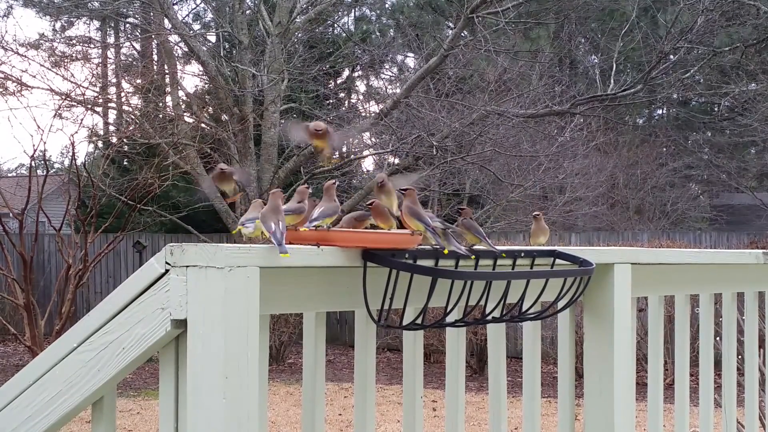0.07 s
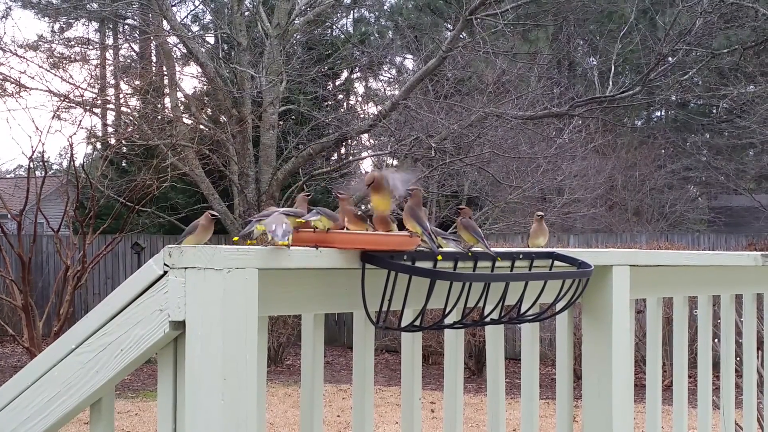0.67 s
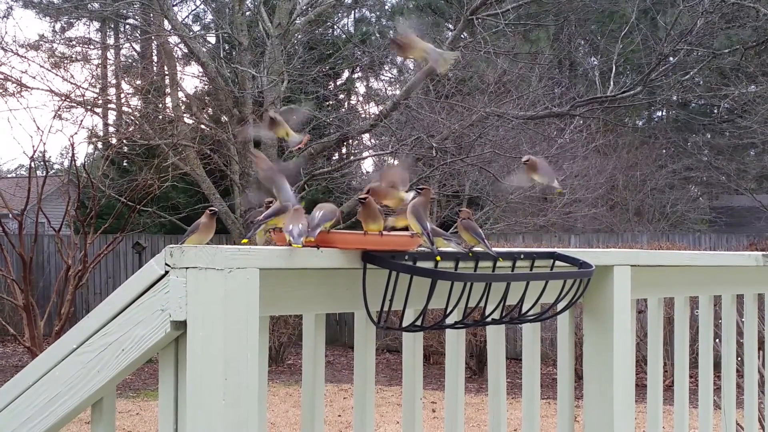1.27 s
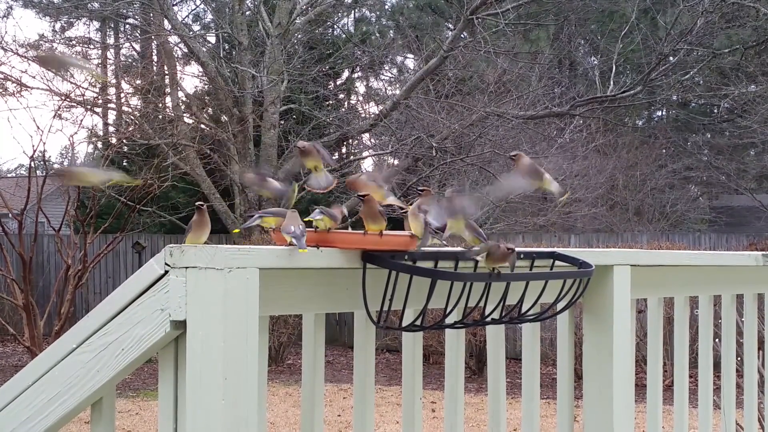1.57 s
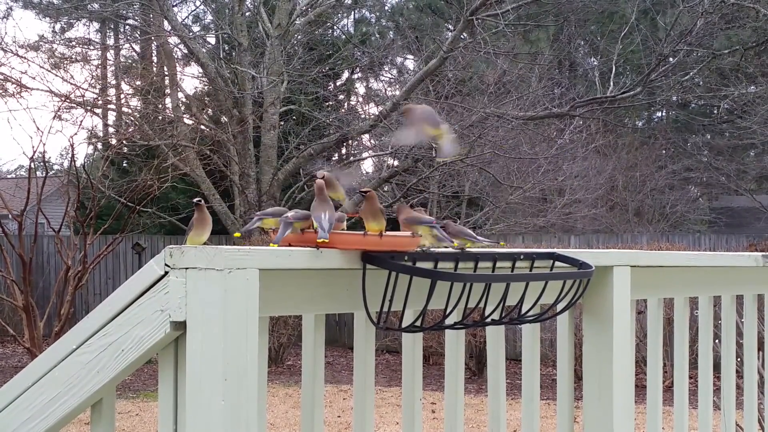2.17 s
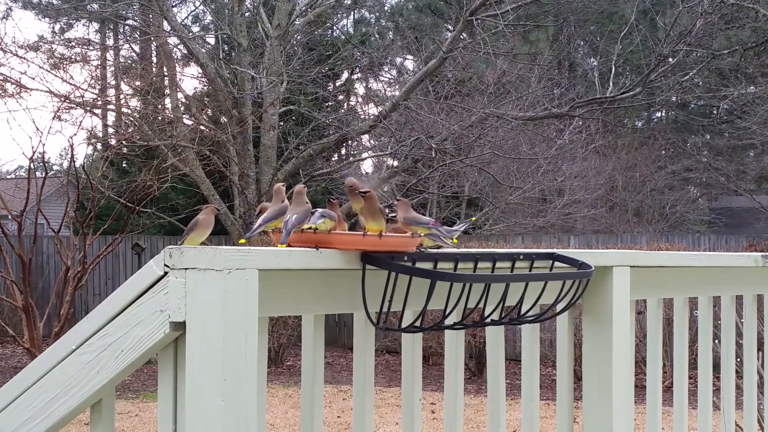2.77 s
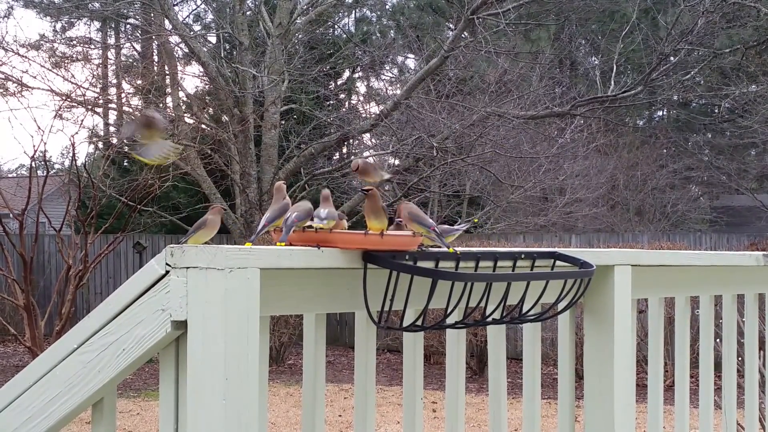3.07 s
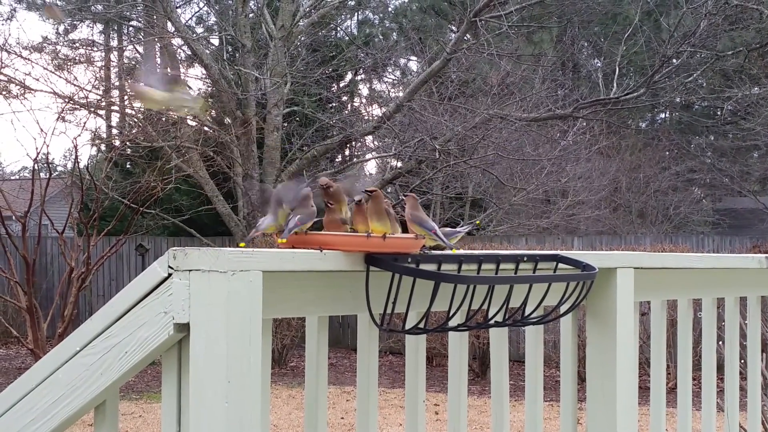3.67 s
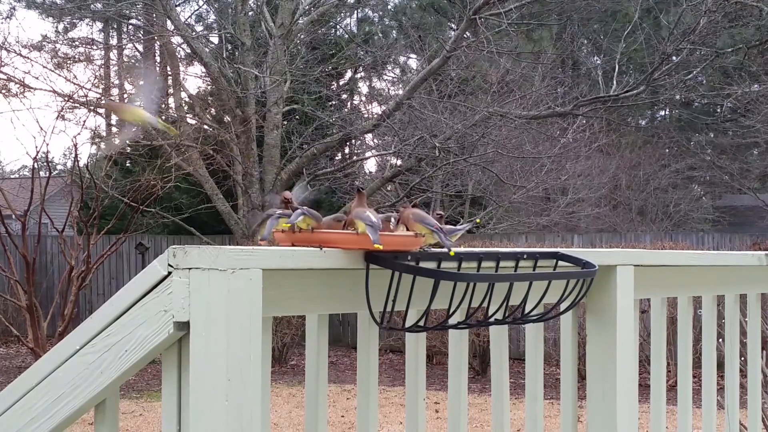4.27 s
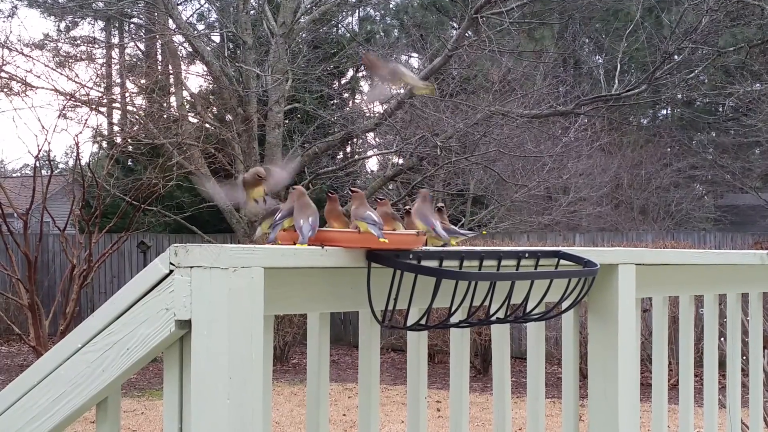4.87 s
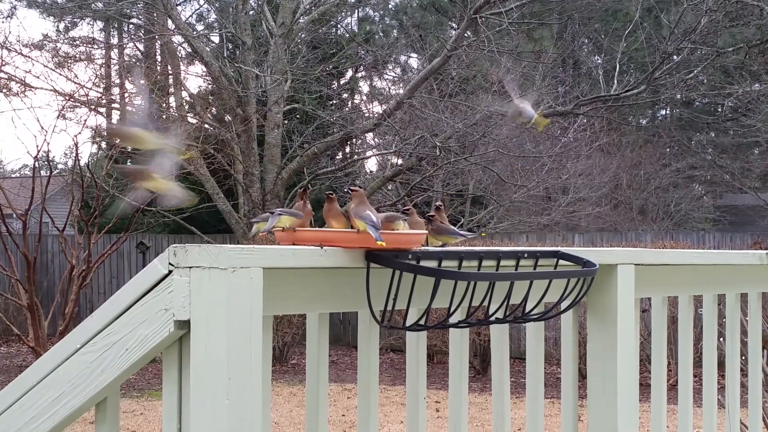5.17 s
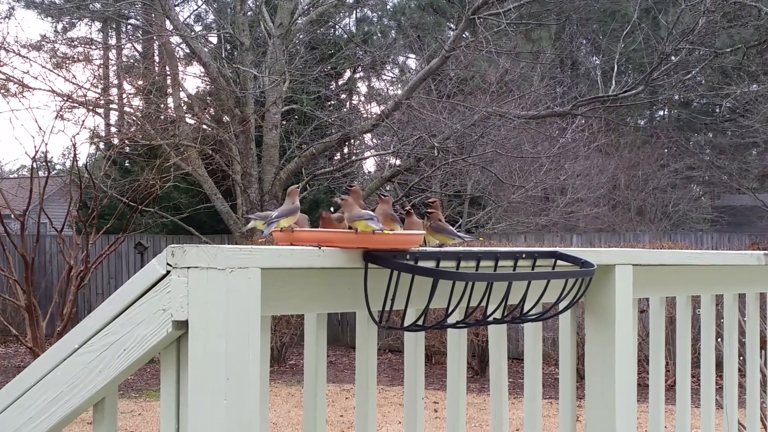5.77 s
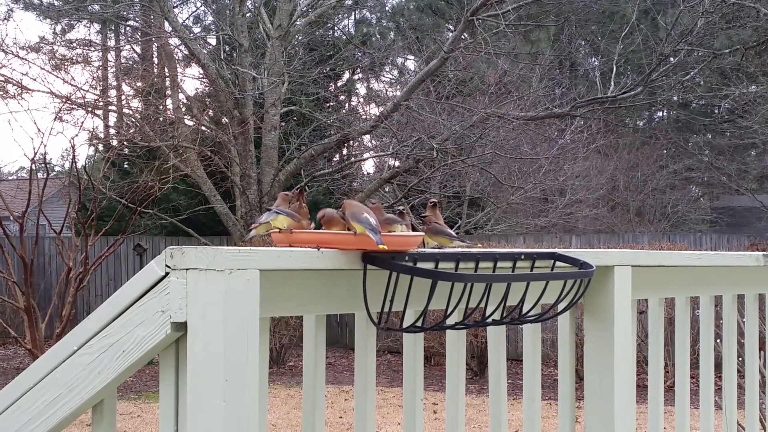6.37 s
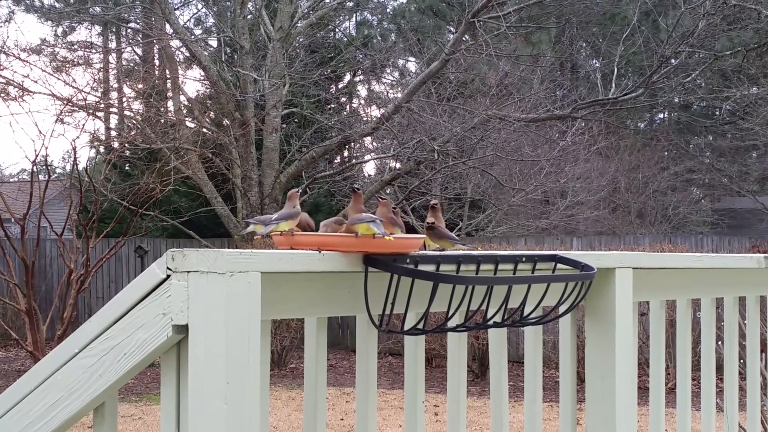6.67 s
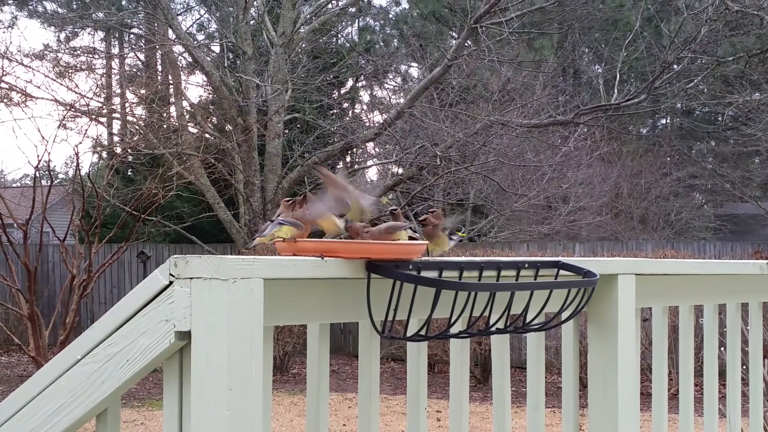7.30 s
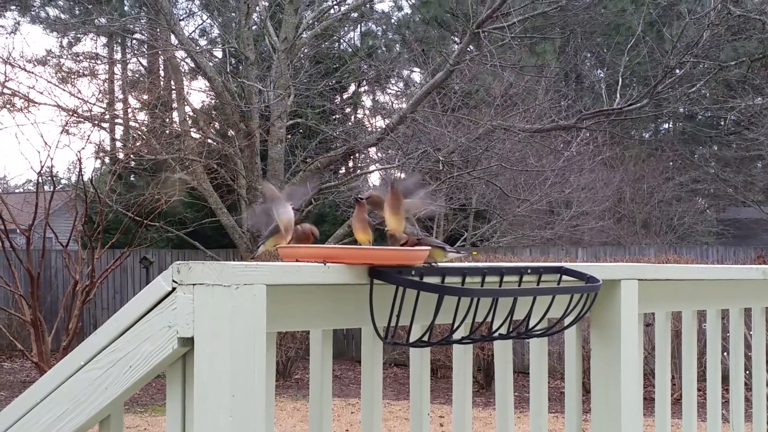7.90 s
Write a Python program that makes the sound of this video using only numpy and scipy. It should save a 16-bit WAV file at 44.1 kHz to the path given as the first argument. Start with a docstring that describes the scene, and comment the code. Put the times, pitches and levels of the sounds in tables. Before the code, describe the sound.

Wingbeats from a flock of small birds swell and fade outdoors, with faint high calls and claw ticks over rumble and hiss.

```python
"""Wingbeats whoosh and rustle: waxwings crowd a dish on a deck rail, a few metres from a phone.
Each downstroke pushes air and rubs feathers. Single birds flutter close to the microphone, claws tick
and landings bump the rail. Thin whistles, a squeal and a trill echo round the yard.
The whoosh, a low rumble and a narrow hiss swell and sink together as one overall background level.
The right microphone is far brighter at the very top than the left."""
import sys
import numpy as np
from scipy import signal
from scipy.fft import rfft, irfft, next_fast_len
from scipy.io import wavfile
from scipy.ndimage import uniform_filter1d

SR = 44100
rng = np.random.default_rng(int(sys.argv[2]) if len(sys.argv) > 2 else 0)


def dump_mix(stems):
    """Bounce the given channels to the path in sys.argv[1] as a 16-bit WAV at rate SR."""
    frames = np.atleast_2d(stems).T  # one column per channel
    limited = np.clip(frames, -1, 1)  # hard clip at full scale
    pcm = np.round(limited * 32767).astype(np.int16)
    wavfile.write(sys.argv[1], SR, pcm)


N = 358974
T = np.arange(N) / SR

# resonances of the background rumble: f/Hz, width/Hz, relative level/dB
RUMBLE_MODES = [(26.2, 22, -27.5), (42.2, 6.4, -6.5), (57.5, 6, -1.5), (73.4, 7, -1), (82.4, 7, -5),
                (115.6, 5.3, -8), (133.8, 19, -15.5)]
# colour of the background hiss: f/Hz, left/dB, right/dB
HISS_SPECTRUM = [(2850, -19, -25.5), (3070, -23.5, -21.5), (3470, -8, -25.5), (3600, -20.5, -15.5),
                 (4025, 4.5, -24.5), (4330, -5, -15.5), (4810, 0, -19.5), (5250, -4.5, -26.5),
                 (5630, -12, -26), (6110, -12, -32), (6820, -34, -32), (7170, -50, -45)]
# arched whistles: t/s, length/s, start f/Hz, middle f/Hz, end f/Hz, crest level/dB, octave above it/dB
WHISTLES = [(.27, .21, 6750, 7020, 6990, -85, 14), (3.78, .36, 7000, 7180, 6850, -78, 13)]
# course of the squeal's fundamental: t/s, f/Hz, level/dB
SQUEAL_COURSE = [(1.426, 6400, -74), (1.435, 6500, -73), (1.442, 6600, -61), (1.456, 6680, -75),
                 (1.483, 6760, -62.5), (1.506, 6900, -66), (1.528, 6740, -75), (1.538, 6950, -60),
                 (1.585, 6600, -77)]
# course of the trill: t/s, f/Hz, level/dB
TRILL_COURSE = [(5.30, 7650, -94), (5.323, 8200, -84), (5.35, 7800, -82), (5.365, 8150, -82),
                (5.387, 7780, -73), (5.398, 8000, -88)]
# claws on the dish: t/s, level/dB
CLAW_TICKS = [(1.0402, -56), (1.166, -64), (1.268, -66), (2.321, -54), (3.6011, -62), (4.8818, -59),
              (6.1613, -59)]
# colour of a claw's click: f/Hz, left/dB, right/dB
CLAW_SPECTRUM = [(3600, -16, -22), (4900, 14, -20), (6200, 2, -24), (7450, -31, -36), (10000, -26, -31),
                 (14000, -15, -17)]
# birds landing on the rail: t/s, level/dB, f/Hz, decay/s
LANDINGS = [(4.15, -35.5, 62, 0.012), (4.286, -37.5, 130, 0.0069), (4.289, -52, 268.5, 0.0064),
            (6.444, -51, 202, 0.038), (7.95, -56, 198.7, 0.11)]
# single birds flapping near the microphone: t/s, length/s, feather level/dB, air level/dB
FLIGHTS = [(0.194, .03, -61, -63), (0.83, .08, -43, -64), (1.495, .03, -59, -52.5), (1.82, .03, -38.5, -52),
           (4.771, .03, -62, -76), (4.818, .77, -44, -54.5), (5.178, .03, -49, -52.5),
           (7.548, .03, -56, -61)]
# perched birds shuffling their wings: t/s, level/dB, decay/s
SHUFFLES = [(6.795, -70, 0.13), (7.197, -80, .044), (7.447, -69, 0.027)]
# quick contacts within one wing clap: t/s, level/dB
CLAP_CONTACTS = [(1.7681, -28), (1.7706, -22), (1.772, -22)]
# colour of the clap's dull puff: f/Hz, left/dB, right/dB
PUFF_SPECTRUM = [(348, -3, 4.5), (650, -7, 1.5), (1000, -12.5, -5.5)]
# colour of air pushed by a near wing: f/Hz, left/dB, right/dB
NEAR_AIR_SPECTRUM = [(342, 4, 4), (586, -4, -2), (1000, -12, -9.5), (1450, -39, -17), (2090, -20, -16.5),
                     (2940, -29, -26), (4400, -23, -18), (6200, -27, -27.5), (7060, -53, -65)]
# colour of air swept by the flock: f/Hz, left/dB, right/dB
FLOCK_AIR_SPECTRUM = [(169.6, 0, -2.5), (218, -5.5, -0.4), (336, -13, -9.5), (563, -15.5, -15.5),
                      (782, -21.5, -21), (1060, -25.5, -25.5), (1496, -33, -31), (2280, -33, -33.5),
                      (2780, -49, -38.5)]
# colour of feathers sliding over each other: f/Hz, left/dB, right/dB
FEATHER_SPECTRUM = [(8500, -46, -46), (10000, -37, -32), (10800, -32, -22), (11500, -25, -12),
                    (12100, -20, -4.5), (12700, -17, 0), (13600, -17, -.5), (14500, -17, -4),
                    (15650, -16.5, -6.5)]
# overall background level: t/s, swell over the usual level/dB, rustle level/dB
BACKGROUND_LEVEL = [(0.0, -0.2, -58.5), (.72, -2.5, -66.5), (1.35, -0.2, -59), (1.65, 3, -51),
                    (1.95, 5.5, -49), (2.5, 0.7, -59.5), (3.35, -3.5, -69.5), (3.75, -2.3, -63.5),
                    (4.4, 3.5, -58.5), (4.65, -3.5, -67.5), (5.2, 2.5, -54.5), (5.7, 0.65, -58),
                    (6.05, -4.5, -72.5), (6.6, -6, -75), (7.0, -12, -82), (7.35, -11, -83.5),
                    (7.56, -6, -67.5), (8.13, -1.6, -59.5)]

RUMBLE_DB, RUMBLE_GROWTH = -46, 0.74  # at the usual background level; dB per dB of swell
HISS_DB, HISS_KNEE_DB = -66, -0.5  # hiss at a knee in the swell; swell at that knee
HISS_GROWTH, HISS_SINK = 0.45, 0.84  # dB per dB of swell above and below the knee
WHISTLE_SWELL_DB, WHISTLE_FALL_DB, WHISTLE_CREST = 14, 13, .8  # crest as a share of the length
WHISTLE_WAVER_HZ, SQUEAL_WAVER_HZ = 35, 95  # random pitch swings: clean whistles, rough squeal
SQUEAL_OCTAVE_DB = 21.5  # octave over the fundamental, before panning
STROKE_S, STROKE_SCATTER_DB = .0524, 1.5  # time between near downstrokes; spread of their push
STROKE_DECAY_S, STROKE_SMEAR_S = 0.0055, 0.00042  # first stroke's decay; what each later one adds
RECEDE = 0.47  # distance gained per stroke, as a share of the starting distance
AIR_FADE = .3  # share of the feathers' fade in dB that the air follows
OPENING_DB, PUFF_DB = -1, -39  # the first stroke only opens the wing and pushes less; the clap's puff
WHOOSH_DB = -58  # the flock's swept air at the usual background level
RUSTLE_LEFT_DB, RUSTLE_LEFT_SHARE = -23, 0.61  # the left microphone gets weaker swells: offset, dB per dB
TOP_HZ = 15720


def undb(db):
    """Decibels to gain."""
    return 10 ** (np.asarray(db) / 20)


def unit(x):
    """Scale to rms 1."""
    return x / np.sqrt(np.mean(x ** 2))


def pan(right_db):
    """Left and right gains, right_db apart."""
    return undb(np.array([[-right_db], [right_db]]) / 2)


def walk(rate):
    """Smooth random wandering, about rate turns a second."""
    hold = max(int(SR / rate), 1)
    steps = np.repeat(rng.standard_normal(N // hold + 2), hold)
    smooth = uniform_filter1d(uniform_filter1d(steps, hold), hold)
    return 1.241 * smooth[rng.integers(hold):][:N]


def noise(alike=0):
    """White noise at both microphones, sharing this part of its power."""
    return np.sqrt(alike) * rng.standard_normal(N) + np.sqrt(1 - alike) * rng.standard_normal((2, N))


def shape(x, response):
    """Filter by a gain over frequency, to rms 1."""
    size = next_fast_len(N)
    hz = np.arange(size // 2 + 1) * SR / size + 1
    return unit(irfft(rfft(x, size) * response(hz), size)[..., :N])


def tint(x, spectrum, below_db=40, above_db=40):
    """Give each microphone its colour, to joint rms 1; the skirts fall by so many dB an octave."""
    points_hz, *sides_db = np.transpose(spectrum)
    def response(hz):
        octave, knots = np.log2(hz), np.log2(points_hz)
        skirts = below_db * np.maximum(knots[0] - octave, 0) + above_db * np.maximum(octave - knots[-1], 0)
        return undb(np.array([np.interp(octave, knots, db) for db in sides_db]) - skirts)
    return shape(x, response)


def bursts(rows, rise_s):
    """Envelope of bursts that swell briefly and die away; rows are t/s, level/dB, decay/s."""
    out = np.zeros(N)
    for s, db, decay in rows:
        start = int(s * SR)
        age = T[:min(N - start, SR // 2)]
        form = (1 - np.exp(-age / rise_s)) ** 2 * np.exp(-age / decay)
        out[start:start + len(age)] += undb(db) * form / form.max()
    return out


def rumble(swell_db):
    """A low boom in a few resonances, much alike at both microphones, following the background level."""
    def response(hz):
        power = sum(undb(db) ** 2 / (1 + ((hz ** 2 - centre ** 2) / (hz * width)) ** 2)
                    for centre, width, db in RUMBLE_MODES)
        return np.sqrt(power) / (1 + (hz / 210) ** 4)
    return shape(noise(alike=0.78), response) * undb(RUMBLE_DB + RUMBLE_GROWTH * swell_db) * pan(3)


def hiss(swell_db):
    """A smooth narrow hiss, mostly on the left, sinking with the background more readily than it rises."""
    over_db = swell_db - HISS_KNEE_DB
    level_db = HISS_DB + over_db * np.where(over_db > 0, HISS_GROWTH, HISS_SINK)
    return tint(noise(), HISS_SPECTRUM, below_db=12, above_db=37) * undb(level_db)


def yard(x, near_db, far_db):
    """Deck and house scatter a call at once; fence and trees answer a quarter second later."""
    near = undb(near_db) * np.exp(-T / .05) * (T > .003)
    far = undb(far_db) * np.exp(-((T - .25) / .08) ** 2)
    response = noise() * (near + far) / np.sqrt(np.sum(np.exp(-T / .025)))
    return x + signal.fftconvolve(x, response[:, :SR], axes=1)[:, :N]


def syrinx(course, swing_hz, flutter_db):
    """Phase and envelope of a bird's thin note, its pitch swinging about its course."""
    s, hz, db = np.transpose(course)
    gate = np.clip(np.minimum(T - s[0], s[-1] - T) / 0.0054 + .5, 0, 1)
    phase = 2 * np.pi * np.cumsum(np.interp(T, s, hz) + swing_hz) / SR
    return phase, np.sqrt(2) * gate * undb(np.interp(T, s, db) + flutter_db * walk(90))


def arch(start, length, start_hz, middle_hz, end_hz, db):
    """A whistle's course, one bow of pitch swelling to a late crest: t/s, f/Hz, level/dB."""
    along = np.linspace(0, 1, 20)
    hz = np.polyval(np.polyfit([0, .5, 1], [start_hz, middle_hz, end_hz], 2), along)
    level_db = db - np.interp(along, [0, WHISTLE_CREST, 1], [WHISTLE_SWELL_DB, 0, WHISTLE_FALL_DB])
    return np.transpose([start + length * along, hz, level_db])


def whistles_and_squeal():
    """Two whistles and a rough squeal in the yard, their strong octaves almost wholly on the right."""
    notes = [(arch(*row), octave_db, WHISTLE_WAVER_HZ) for *row, octave_db in WHISTLES]
    notes.append((SQUEAL_COURSE, SQUEAL_OCTAVE_DB, SQUEAL_WAVER_HZ))
    out = 0
    for course, octave_db, waver_hz in notes:
        phase, envelope = syrinx(course, swing_hz=waver_hz * walk(500), flutter_db=.7)
        octave = undb(octave_db + 1.5 * walk(120)) * np.sin(2 * phase)
        out = out + envelope * (np.sin(phase) * pan(9) + octave * undb([[-28], [3]]))
    return yard(out, near_db=-10, far_db=-33)


def trill():
    """One trill off to the right, buzzing as its pitch sweeps quickly up and down."""
    buzz_hz = 230 * np.sin(2 * np.pi * 210 * T) + 140 * walk(1200)
    phase, envelope = syrinx(TRILL_COURSE, swing_hz=buzz_hz, flutter_db=4)
    throat = signal.butter(5, [7400, 8450], "bandpass", fs=SR, output="sos")
    note = signal.sosfilt(throat, envelope * np.sin(phase))
    return yard(note * pan(20), near_db=-14, far_db=-23)


def feet():
    """Claws click on the hard dish; landings make the rail ring dully."""
    ticks = bursts([(s, db, .0012) for s, db in CLAW_TICKS], rise_s=0.00082)
    out = tint(noise(), CLAW_SPECTRUM, below_db=20) * ticks
    for s, db, hz, decay in LANDINGS:
        ring = np.sqrt(2) * np.sin(2 * np.pi * np.cumsum(hz * (1 + 0.1011 * walk(90))) / SR)
        out = out + ring * bursts([(s, db - 2.5, decay)], rise_s=0.0057) * pan(7.5)
    return out


def downstrokes():
    """Even wingbeats, fading and blurring as a bird draws away: t/s, feathers/dB, air/dB, decay/s."""
    rows = []
    for start, length, feather_db, air_db in FLIGHTS:
        for k in range(int(length / STROKE_S) + 1):
            fade_db = 20 * np.log10(1 + RECEDE * k)
            push_db = air_db - AIR_FADE * fade_db + OPENING_DB * (k == 0)
            decay = STROKE_DECAY_S + STROKE_SMEAR_S * k
            rows.append((start + k * STROKE_S, feather_db - fade_db, push_db, decay))
    return rows


def close_wings():
    """Downstrokes and shuffles near the microphone, and one wing clap that squeezes out a dull puff."""
    beats = downstrokes()
    pushes = [(s, db + STROKE_SCATTER_DB * rng.standard_normal(), decay) for s, _, db, decay in beats]
    push = bursts(pushes, rise_s=.0025)
    swish = bursts([(s, db, decay) for s, db, _, decay in beats] + SHUFFLES, rise_s=.0013)
    clap = bursts([(s, db, .0004) for s, db in CLAP_CONTACTS], rise_s=0.0036)
    squeeze = bursts([(CLAP_CONTACTS[0][0], PUFF_DB, .004)], rise_s=0.0011)
    feathers = tint(noise(), FEATHER_SPECTRUM, below_db=43) * (swish + clap) * undb([[-15], [0]])
    puff = tint(noise(alike=.3), PUFF_SPECTRUM, below_db=20, above_db=36) * squeeze
    air = tint(noise(alike=.1), NEAR_AIR_SPECTRUM, below_db=12) * (push + undb(-13) * squeeze)
    return feathers + puff + air


def flapping(beat_hz, stroke_width, birds=5):
    """Envelope of several birds beating at their own drifting rates, coming and going; powers add."""
    power = 0
    for _ in range(birds):
        cycles = np.cumsum(beat_hz * (1 + .13 * walk(5.4))) / SR + rng.random()
        pulses = np.exp((np.cos(2 * np.pi * cycles) - 1) / stroke_width)
        power = power + undb(2.5 * walk(4.17)) * pulses
    return unit(np.sqrt(power))


def flock(swell_db, rustle_db):
    """The crowd at the dish, a few metres off: every downstroke sweeps air and rubs feathers."""
    pulse_depth = np.clip(undb(0.5 * (swell_db + 5.5)), 0, 1)  # shallower where the level dips far
    strokes = flapping(beat_hz=19, stroke_width=2.2) ** pulse_depth
    air = tint(noise(alike=.12) * strokes, FLOCK_AIR_SPECTRUM, below_db=17.5, above_db=15.5)
    rubbing = noise() * strokes * undb(1.4 * walk(700))  # the barbs make it grainy
    feathers = tint(rubbing, FEATHER_SPECTRUM, below_db=12)
    left_db = RUSTLE_LEFT_DB + RUSTLE_LEFT_SHARE * rustle_db
    return air * undb(WHOOSH_DB + swell_db) + feathers * undb([left_db, rustle_db])


def scene():
    """The deck as heard from the phone; whoosh, rumble and hiss swell and sink together."""
    s, *columns = np.transpose(BACKGROUND_LEVEL)
    swell_db, rustle_db = (np.interp(T, s, column) for column in columns)
    birds = flock(swell_db, rustle_db) + close_wings() + feet() + whistles_and_squeal() + trill()
    return birds + rumble(swell_db) + hiss(swell_db)


def record(dry):
    """The phone adds a trace of its own noise and cuts the top."""
    top_cut = signal.ellip(10, .2, 70, TOP_HZ, fs=SR, output="sos")
    return signal.sosfilt(top_cut, dry + undb(-92) * noise())


dry = scene()
out = record(dry)
dump_mix(out)
```